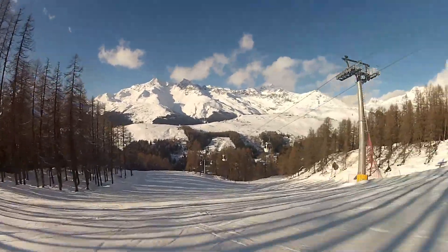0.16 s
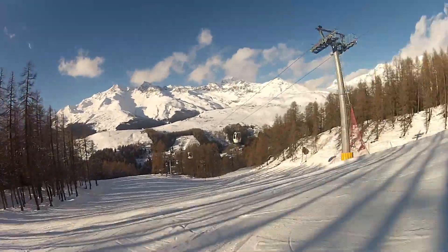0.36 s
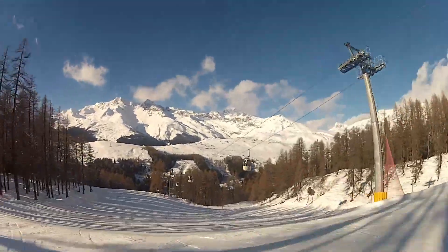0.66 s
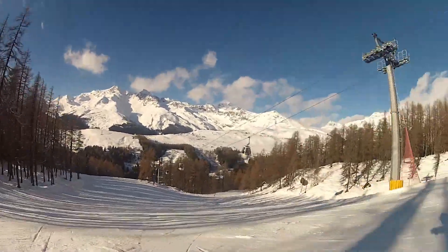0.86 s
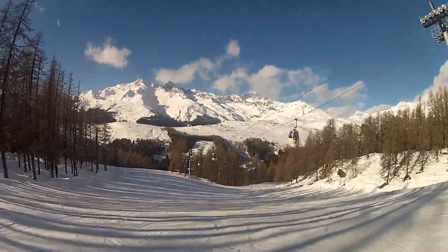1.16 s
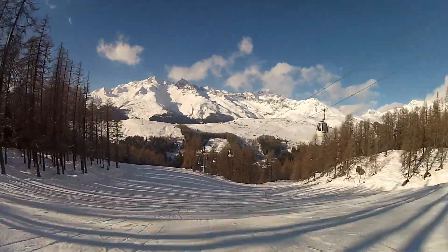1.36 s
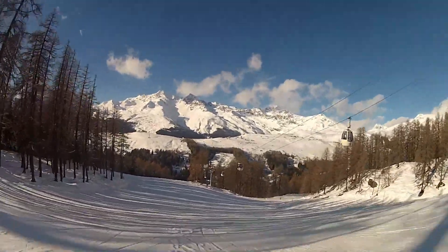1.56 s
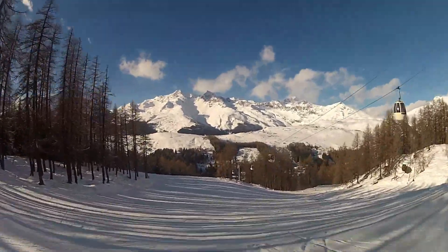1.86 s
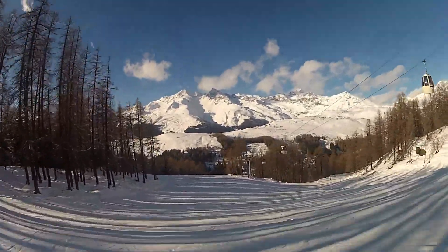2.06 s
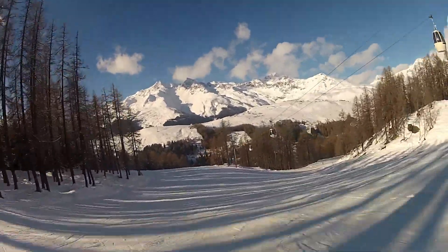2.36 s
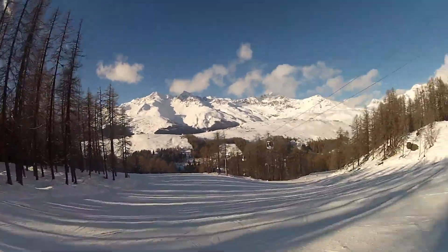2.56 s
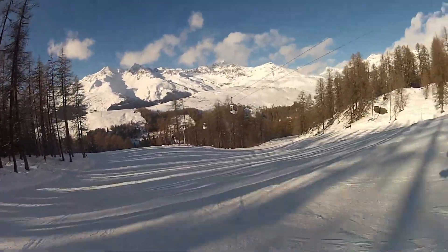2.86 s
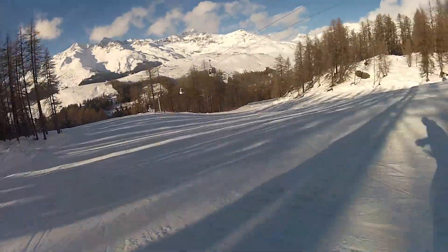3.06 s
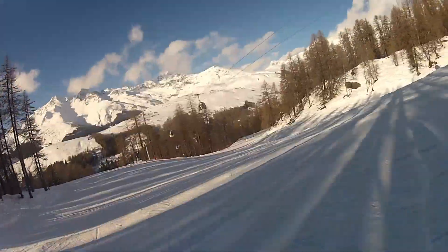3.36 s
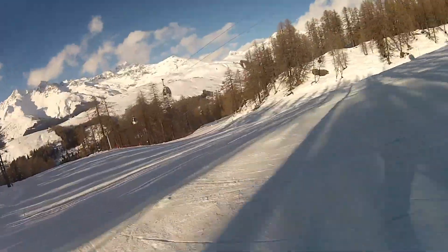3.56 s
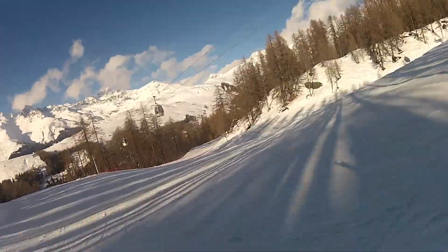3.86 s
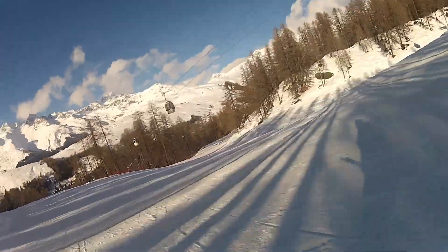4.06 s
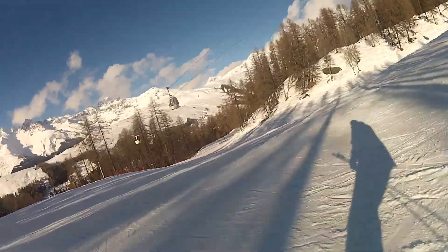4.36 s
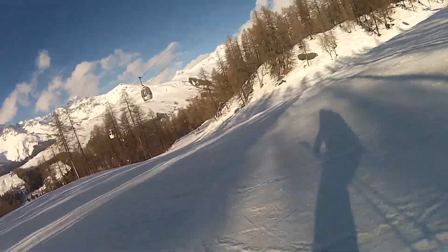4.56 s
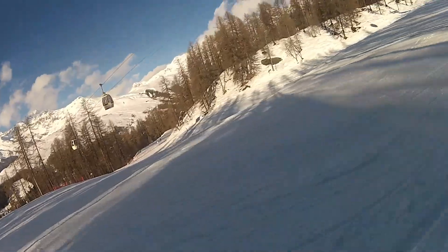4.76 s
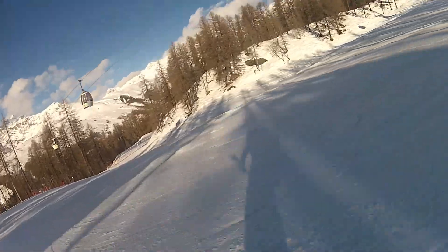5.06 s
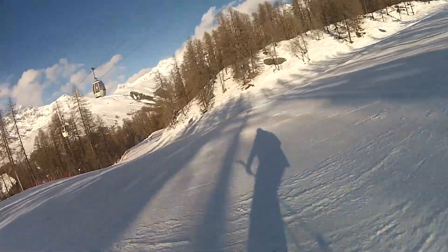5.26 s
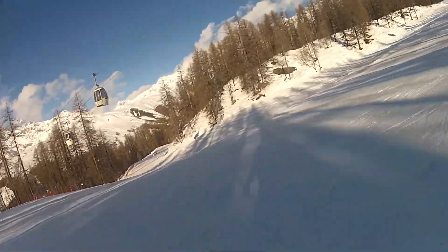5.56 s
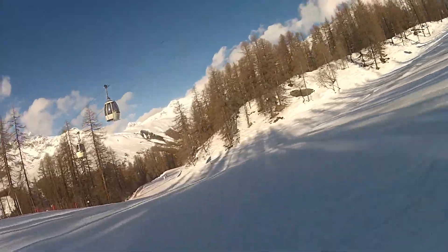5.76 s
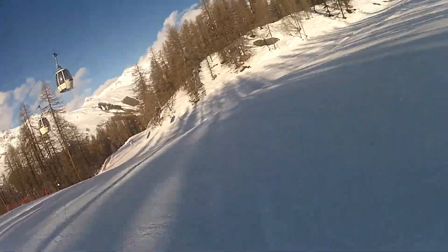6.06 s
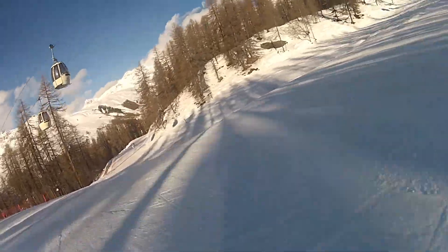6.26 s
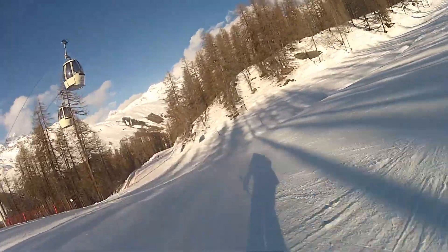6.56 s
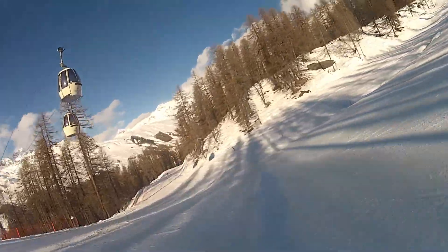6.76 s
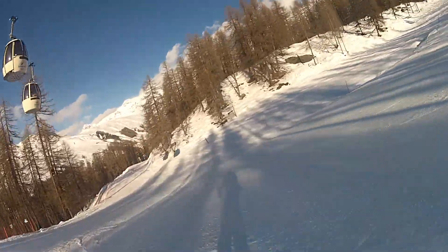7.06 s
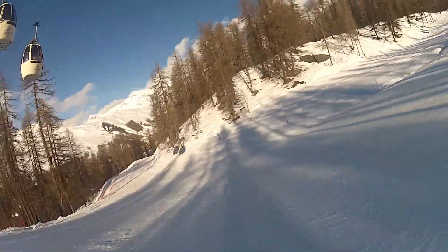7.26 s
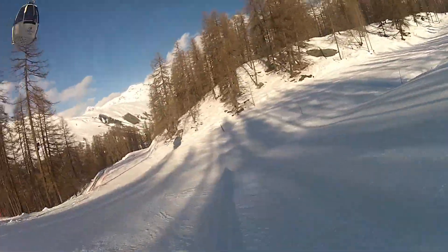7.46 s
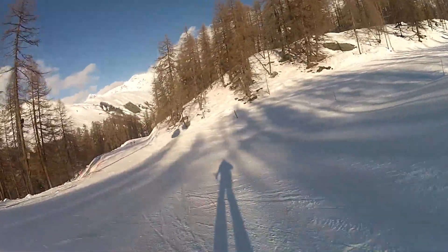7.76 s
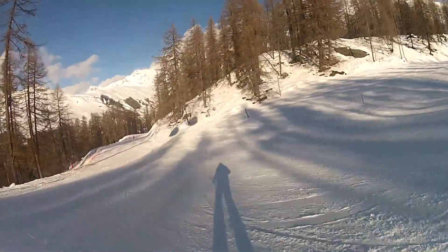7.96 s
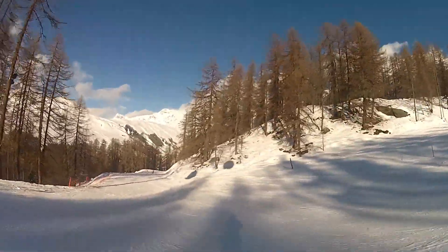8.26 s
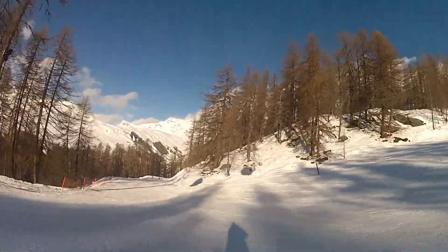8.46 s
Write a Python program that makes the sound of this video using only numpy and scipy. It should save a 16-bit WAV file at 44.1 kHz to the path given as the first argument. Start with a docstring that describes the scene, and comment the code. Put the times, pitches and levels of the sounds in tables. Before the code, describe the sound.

Close, boxy sound from a camera worn by a skier outdoors, without echo. Crushed snow crackles and hisses continuously, with soft low wind thumps beneath. Quick rasping scrapes and clicks come often early on; the carve grows dense and smooth in the middle, with one sharp scrape near five seconds, then quietens, with faint ice snaps and a final flurry of scrapes.

```python
"""A skier glides down groomed snow and carves one long turn, heard from a cased camera worn on the body.
From the start crushed crystals hiss under the skis, turbulent air buffets the microphone, and an edge skids.
Grain bursts then scrape, damped modes knock, and hiss and wind swell as the load and the air stream build.
Mid-turn the treble drops out briefly; the load eases; ice splinters snap once in the turn and twice after it.
Near the end an edge skids again. Case resonances colour friction and scrapes; held samples add a glassy top."""
import sys
import numpy as np
from scipy import signal
from scipy.fft import rfft, irfft
from scipy.io import wavfile
from scipy.ndimage import uniform_filter1d

SR = 44100
rng = np.random.default_rng(int(sys.argv[2]) if len(sys.argv) > 2 else 0)


def to_wav(s):
    """Save 16-bit WAV."""
    ch = np.atleast_2d(s).T  # columns
    pcm = np.round(np.clip(ch, -1, 1) * 32767)  # PCM
    wavfile.write(sys.argv[1], SR, pcm.astype(np.int16))


N = 380583
TIME = np.arange(N) / SR
FREQ = np.maximum(np.fft.rfftfreq(4096, 1 / SR), 1)  # at least 1 Hz, so that its logarithm exists

# Load on the skis, building through the turn and easing after it:
# (time [s], pressure as level [dB])
PRESSURE = [(0, -44.5), (0.24, -40), (.35, -43.5), (0.44, -48), (0.53, -44.5), (0.78, -43), (1.0, -39),
            (1.33, -39), (1.46, -37.5), (1.6, -39.5), (1.82, -38.5), (2.02, -41.5), (2.15, -39.5),
            (2.65, -37.5), (3.05, -34), (3.85, -33), (4.07, -30), (4.45, -36.5), (4.65, -34), (5.5, -39.5),
            (5.92, -39.5), (6.5, -46.5), (6.8, -47), (7.0, -46), (8.12, -46.5), (8.3, -43), (8.63, -39.5)]
# How hard the steel edges bite: (time [s], treble level relative to the pressure [dB])
BITE = [(0.0, -11), (0.28, -15), (0.45, -7.5), (2.8, -10.5), (3.75, -11.5), (4.03, -8.5), (4.25, -10.5),
        (5.6, -10.5), (6.3, -7), (7.5, -11), (7.9, -9), (8.45, -7.5)]
# The skis go light over a dip in the slope: (middle [s], half length to 1/e of the drop [s], drop [dB])
LIFTS = [(2.67, .05, 2.5), (4.48, 0.0098, 3.5), (5.755, 0.033, 1), (6.885, 0.03, 5), (7.79, 0.036, 3)]
# Spectrum of ski friction on snow: (frequency [Hz], relative level [dB])
SNOW_SPECTRUM = [(150, -25.5), (400, -15.5), (700, -14.5), (1000, -9.5), (1500, -10), (2200, -9),
                 (2750, -11.5), (3500, -13), (3900, -10.5), (4450, -13.5), (5700, -11.5), (6600, -23)]
# Resonances of the camera case: (frequency [Hz], full width at half the boost [Hz], boost [dB])
CASE_RESONANCES = [(1208, 264, 6.5), (1650, 260, 2.5), (2034, 314, 4), (2378, 230, 5), (3228, 370, 8),
                   (3608, 190, 8.5), (4110, 120, 2.5)]
STEADY_DB = -36  # pressure of a firmly carving ski
PACKING_DB, EDGE_DB, SLIDE_DB = -7, 0.5, -0.75  # shares of base, edge and sliding friction
FINE_DB, FINE_PER_DB = 2, 0.32  # fine over coarse hiss when carving, and its fall per dB of lost pressure
# Ripples of the slope jog the skis: rate, spread at steady load, and added spread per dB of lost pressure
BUMPS_PER_S, BUMP_DB, BUMP_PER_DB = 20, 0.38, 0.0767
# The ski's own ring: level at steady load, and its rise per dB of lost pressure
RING_HZ, RING_WIDTH_HZ, RING_DB, RING_PER_DB = 1980, 140, -12, 0.5

# Air stream on the microphone: (time [s], relative level [dB])
AIR = [(0, -50), (.22, -51), (0.5, -53), (0.95, -46.5), (1.3, -48.5), (1.65, -46), (2.15, -47.5),
       (2.33, -46.5), (2.57, -46.5), (2.76, -39.5), (3.4, -41), (3.85, -38), (4.5, -42), (5.0, -44),
       (5.6, -43), (6.25, -47.5), (6.7, -54), (8.0, -51), (8.63, -48)]
# Buffeting by the large eddies: (time [s], relative level [dB])
BUFFETS = [(0, -50), (1.5, -50.5), (2.85, -50.5), (3.4, -46), (4.1, -47), (4.8, -50.5), (5.7, -50),
           (6.7, -52), (7.8, -53), (8.63, -51.5)]
# Single gusts thump the microphone: (middle [s], half length to 1/e [s], level [dB])
GUSTS = [(.33, 0.083, -50), (.67, 0.045, -46), (2.68, 0.065, -45), (3.12, 0.051, -43), (3.7, .06, -43),
         (4.352, .05, -42), (5.6, .08, -46), (7.35, 0.067, -47)]
# Wind spectra of large, middling and small eddies: each (frequency [Hz], relative level [dB])
LARGE_EDDIES = [(10, -1.5), (25, 2), (45, -0.5), (80, 0.5), (120, -7), (250, -33), (700, -62)]
MIDDLING_EDDIES = [(40, -19.5), (100, -4.5), (160, -2), (250, -6), (400, -12), (700, -27.5), (1500, -51)]
SMALL_EDDIES = [(60, -11), (180, -4), (300, -0.5), (400, 0), (700, -10), (1500, -31)]

# Long sideways skids: (middle [s], half length to 1/e [s], level [dB], pitch [Hz])
SKIDS = [(.18, 0.2, -47, 3220), (8.5, 0.22, -51.5, 4040)]
SKID_WIDTH_HZ = 260
# An edge catches a ridge of snow: (time [s], relative level [dB], decay to 1/e [s], pitch [Hz])
SCRAPES = [(.212, -38.5, 0.058, 2120), (.320, -29, 0.02, 3030), (.486, -28.5, 0.009, 3180),
           (.628, -34, .012, 3200), (.916, -29.5, .008, 1950), (.957, -27, 0.012, 2200),
           (1.030, -37, 0.011, 4300), (1.42, -33, 0.042, 2200), (1.465, -31, 0.019, 3300),
           (1.549, -27.5, 0.011, 2000), (1.79, -35.5, 0.084, 1130), (2.068, -29.5, 0.019, 2370),
           (2.117, -33, .018, 2400), (2.151, -26, 0.0066, 3300), (2.33, -30, 0.019, 2400),
           (2.482, -35, .03, 2050), (2.595, -30.5, 0.019, 2100), (2.855, -31, .03, 2000),
           (3.062, -29, 0.03, 2200), (3.22, -24.5, .017, 2400), (3.77, -23, 0.023, 2330),
           (4.107, -23, 0.0098, 2200), (4.64, -27.5, 0.033, 2180), (4.779, -17.5, 0.0059, 3300),
           (5.784, -32, 0.05, 2500), (5.86, -34, 0.088, 2250), (6.103, -34, 0.025, 2100),
           (6.684, -44, 0.018, 2010), (7.034, -35, 0.063, 2190), (7.274, -34.5, 0.016, 2200),
           (8.281, -32, .008, 2200), (8.325, -35, .012, 2100), (8.396, -31, 0.016, 3700),
           (8.415, -31, .022, 3600), (8.512, -29, 0.022, 2200), (8.526, -31, .006, 4200),
           (8.586, -31, .016, 2400)]
# Hard knocks of ice lumps and gear:
# (time [s], level [dB], pitch [Hz], 60 dB decay [s], crack level relative to the knock [dB])
KNOCKS = [(.6255, -30, 1950, .016, -12), (.766, -31, 2050, .012, -12), (0.8764, -18, 2010, 0.01, -8.5),
          (1.197, -21.5, 2000, 0.024, -13), (3.321, -21, 2150, .012, -14), (5.281, -28, 2100, .012, -16),
          (6.387, -31, 2040, 0.015, -15), (6.661, -32, 2050, .014, -14), (6.911, -35.5, 2030, 0.02, -13),
          (7.465, -32, 2060, .012, -8), (8.108, -27.5, 1160, 0.02, -18)]
# Spectrum of the snap of a hard contact: (frequency [Hz], relative level [dB])
CRACK_SPECTRUM = [(600, -26), (1300, -22), (1900, -6), (3300, 13), (4200, -5), (5700, -8)]
# The treble drops out briefly: (middle [s], half length to 1/e of the drop [s], drop [dB])
DROPOUTS = [(3.173, .013, 24), (3.416, .004, 10), (3.46, .004, 12), (3.78, .005, 12), (5.498, .014, 24),
            (5.70, .005, 15), (5.742, .006, 10)]
DROPOUT_HZ = 4000  # only the treble above this drops out
# Band missing near the top of the treble: (lower edge [Hz], upper edge [Hz])
HOLLOW_HZ = (11150, 12950)
# Ice splinters: (time [s], level [dB], decay to 1/e [s])
CHIPS = [(3.3, -32, .004), (7.243, -42, 0.013), (7.502, -38.5, 0.0045)]
# Spectrum of splintering ice: (frequency [Hz], relative level [dB])
ICE_SPECTRUM = [(2000, -30), (3800, -18), (4500, -1), (5700, -4), (6500, -13)]
HOLD_HZ, TOP_HZ = 12000, 15350  # rate of the held samples, and upper limit of the sound


def undb(db):
    """Amplitude ratio: 20 dB is a factor of ten."""
    return 10 ** (np.asarray(db) / 20)


def unit(x):
    """Normalization: division by the standard deviation gives unit fluctuation."""
    return x / np.std(x)


def curve(table):
    """Linear interpolation: a (time, level) table becomes one level per sample."""
    seconds, level_db = np.transpose(table)
    return np.interp(TIME, seconds, level_db)


def walk(rate):
    """Smoothed random steps: a fluctuation of spread 1 with a new random target rate times a second."""
    step = int(SR / rate)
    targets = rng.standard_normal(N // step + 1)
    return unit(uniform_filter1d(np.repeat(targets, step), step)[:N])


def swell(middle, half):
    """Gaussian envelope: a smooth rise and fall around its middle."""
    return np.exp(-((TIME - middle) / half) ** 2)


def dips(table):
    """Fourth-power Gaussian envelopes: short, flat-bottomed drops of level in dB."""
    return -sum(db * np.exp(-((TIME - middle) / half) ** 4) for middle, half, db in table)


def colour(x, points, resonances=()):
    """Minimum-phase filtering: the folded cepstrum of a spectrum gives its causal response."""
    hz, db = np.transpose(points)
    shape_db = np.interp(np.log(FREQ), np.log(hz), db)
    for centre, width, boost in resonances:
        shape_db = shape_db + boost * 2 ** -((2 * (FREQ - centre) / width) ** 2)
    cepstrum = irfft(np.log(undb(shape_db)))
    cepstrum[1:len(FREQ) - 1] *= 2
    cepstrum[len(FREQ):] = 0
    response = irfft(np.exp(rfft(cepstrum)))
    return signal.oaconvolve(x, response)[:len(x)]


def split(x, hz):
    """Complementary bands: a zero-phase low-pass and the remainder above it."""
    low = signal.sosfiltfilt(signal.butter(6, hz, fs=SR, output="sos"), x)
    return low, x - low


def crystals(rate, spread_db, hiss_db):
    """Random fracture: many small grain snaps and a few large ones lie over smooth sliding hiss."""
    sizes = undb(spread_db * np.minimum(rng.exponential(size=N), 5))
    snaps = (rng.random(N) < rate / SR) * sizes * rng.choice([-1, 1], N)
    return unit(unit(snaps) + undb(hiss_db) * rng.standard_normal(N))


def crumbles(rate, fade_s):
    """Brittle failure: crust gives way at random moments, and each jolt starts at once and fades."""
    jolts = (rng.random(N) < rate / SR) * rng.uniform(0.2, 1, N)
    load = signal.lfilter([1], [1, -np.exp(-1 / (fade_s * SR))], jolts)
    return unit(load - load.mean())


def ring(contact, slack_db):
    """Damped resonance: larger grains tap the ski, which rings the more the less the snow damps it."""
    taps = contact * crystals(rate=260, spread_db=3.0, hiss_db=-10)
    mode = signal.iirpeak(RING_HZ, RING_HZ / RING_WIDTH_HZ, fs=SR)
    ringing = signal.lfilter(*mode, colour(taps, SNOW_SPECTRUM, CASE_RESONANCES))
    return unit(ringing) * undb(RING_DB + RING_PER_DB * slack_db)


def skis(crust_weight=0.2524, chatter_weight=-0.05, loosening=0.027, grip_db=1.3, shift_db=1.5,
         blending=0.16, patchy_db=1.0):
    """Sliding friction: breaking crust jolts the contact, and a lightly loaded ski chatters more."""
    pressure_db, bite_db = curve(PRESSURE), curve(BITE)
    slack_db = STEADY_DB - pressure_db
    bumps_db = (BUMP_DB + BUMP_PER_DB * slack_db) * walk(BUMPS_PER_S)
    looseness_db = 3.0 + np.clip(loosening * slack_db, 0, 1.5)
    jolting = crust_weight * crumbles(rate=90, fade_s=0.011) + chatter_weight * walk(170)
    contact = undb(looseness_db * jolting)

    # the flat base packs patches of soft snow with a low crunch
    crunch = contact * crystals(rate=1500, spread_db=2.1, hiss_db=2)
    pack, _ = split(colour(crunch, SNOW_SPECTRUM, CASE_RESONANCES), 1450)
    pack = unit(pack) * undb(PACKING_DB + patchy_db * walk(25))

    # under load so many crystals break at once that they blend into smooth hiss
    smooth = undb(-blending * slack_db)
    grains = crystals(rate=1900, spread_db=0.5, hiss_db=-4.5) + smooth * rng.standard_normal(N)
    grains = grains / np.sqrt(1 + smooth ** 2)
    _, friction = split(colour(contact * grains, SNOW_SPECTRUM, CASE_RESONANCES), 1400)
    slide, edge = split(friction, 3500)

    # the carving ski sprays finer snow, which brightens the hiss
    coarse, fine = split(slide, 2200)
    fineness = undb(FINE_DB - FINE_PER_DB * slack_db + shift_db * walk(30))
    slide = (unit(coarse) + fineness * unit(fine)) / np.sqrt(1 + fineness ** 2)

    # the steel edge grips and lets go at its own pace
    edge = unit(edge * undb(grip_db * walk(140))) * undb(bite_db + EDGE_DB)
    layers = pack + slide * undb(SLIDE_DB) + edge + ring(contact, slack_db)
    return undb(pressure_db + bumps_db + dips(LIFTS)) * layers


def wind(full_db=-38.0, brightening=1.02, buffet_db=0.8, flutter_db=0.28, unsteady_db=2.0):
    """Turbulence: faster air is louder and sheds smaller eddies, so it sounds higher."""
    air_db, rumble_db = curve(AIR), curve(BUFFETS)
    spectra = (LARGE_EDDIES, MIDDLING_EDDIES, SMALL_EDDIES)
    large, middling, small = (unit(colour(rng.standard_normal(N), shape)) for shape in spectra)
    # eddy size follows the skier's speed, which changes more slowly than the gusts
    speed_db = uniform_filter1d(air_db, SR) - full_db
    share = undb(brightening * speed_db)
    flutter = (middling + share * small) / np.sqrt(1 + share ** 2)
    flutter_gain = undb(air_db + flutter_db + buffet_db * walk(20))
    gusts = sum(undb(db) * swell(middle, half) for middle, half, db in GUSTS)
    # steady rumble and gusts add as powers
    rumble_gain = np.hypot(undb(rumble_db + unsteady_db * walk(12)), gusts)
    return flutter * flutter_gain + large * rumble_gain


def skids(rough_db=3.0):
    """Band-limited friction: an edge skids sideways and rasps in one narrow band."""
    out = np.zeros(N)
    for middle, half, db, hz in SKIDS:
        limits = [hz - SKID_WIDTH_HZ / 2, hz + SKID_WIDTH_HZ / 2]
        band = signal.butter(2, limits, "bandpass", fs=SR, output="sos")
        grains = crystals(rate=1000, spread_db=2.5, hiss_db=-11) * undb(rough_db * walk(90))
        out += unit(signal.sosfilt(band, grains)) * undb(db) * swell(middle, half)
    return out


def scrapes(rise_s=0.0013, scrape_db=-5.5, focus_db=16, focus_width=0.5):
    """Transient friction: an edge cuts a ridge in a short burst of grains; icier ridges sound higher."""
    out, age = np.zeros(N + SR), TIME[:SR // 8]
    grains = crystals(rate=2200, spread_db=2.4, hiss_db=-2)
    for k, (s, db, length, hz) in enumerate(SCRAPES):
        force = (1 - np.exp(-age / rise_s)) * np.exp(-(age / length) ** 2)
        focus = (hz, focus_width * hz, focus_db)  # width in proportion to pitch
        own_grains = grains[k * len(age):(k + 1) * len(age)]
        burst = colour(own_grains, SNOW_SPECTRUM, [*CASE_RESONANCES, focus])
        start = int(s * SR)
        out[start:start + len(age)] += undb(db + scrape_db) * force * unit(burst)
    return out[:N]


def knocks(rise_s=0.0015, crack_s=0.0017):
    """Impact excitation: each knock cracks and rings one heavily damped mode."""
    out, age = np.zeros(N), TIME[:SR // 10]
    push, after = np.minimum(age / rise_s, 1), np.maximum(age - rise_s, 0)
    for s, db, hz, t60, crack_db in KNOCKS:
        mode = np.exp(-np.log(1000) * after / t60) * np.sin(2 * np.pi * hz * age)
        snap = unit(colour(rng.standard_normal(len(age)), CRACK_SPECTRUM))
        crack = undb(crack_db) * np.exp(-after / crack_s) * snap
        start = int(s * SR)
        out[start:start + len(age)] += undb(db) * push * (mode + crack)
    return out


def flicker(x):
    """Band-selective attenuation: the treble drops out for moments and is hollow near its top."""
    body, treble = split(x, DROPOUT_HZ)
    hollow = signal.butter(14, HOLLOW_HZ, "bandstop", fs=SR, output="sos")
    return signal.sosfilt(hollow, body + treble * undb(dips(DROPOUTS)))


def chips(rise_s=0.00066):
    """Brittle fracture: bits of ice splinter under the edge with a thin, crisp snap."""
    out, age = np.zeros(N), TIME[:SR // 20]
    for s, db, length in CHIPS:
        force = (1 - np.exp(-age / rise_s)) * np.exp(-(age / length) ** 2)
        snap = unit(colour(rng.standard_normal(len(age)), ICE_SPECTRUM))
        start = int(s * SR)
        out[start:start + len(age)] += undb(db) * force * snap
    return out


def scene():
    """Superposition in the open: skis and wind add at one microphone, without echo."""
    return (skis() + wind() + skids() + scrapes() + knocks() + chips())[None]


def record(dry):
    """Sample-and-hold imaging: held coarse samples mirror the hiss into the treble; then the top is cut."""
    narrow = signal.sosfilt(signal.butter(36, 5720, fs=SR, output="sos"), dry)
    coarse = signal.resample_poly(narrow, HOLD_HZ, SR, axis=1, window=("kaiser", 3))
    steps = np.repeat(coarse, 4, axis=1)
    held = signal.resample_poly(steps, SR, 4 * HOLD_HZ, axis=1)[:, :N]
    top_cut = signal.ellip(10, .2, 70, TOP_HZ, fs=SR, output="sos")
    return signal.sosfilt(top_cut, flicker(held))


dry = scene()
out = record(dry)
to_wav(out)
```